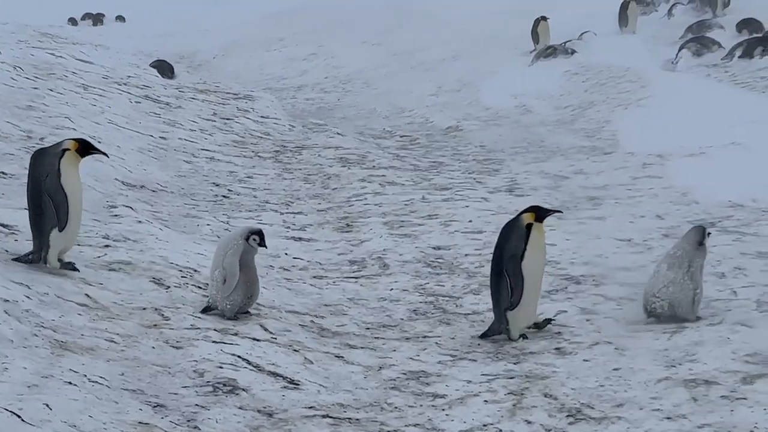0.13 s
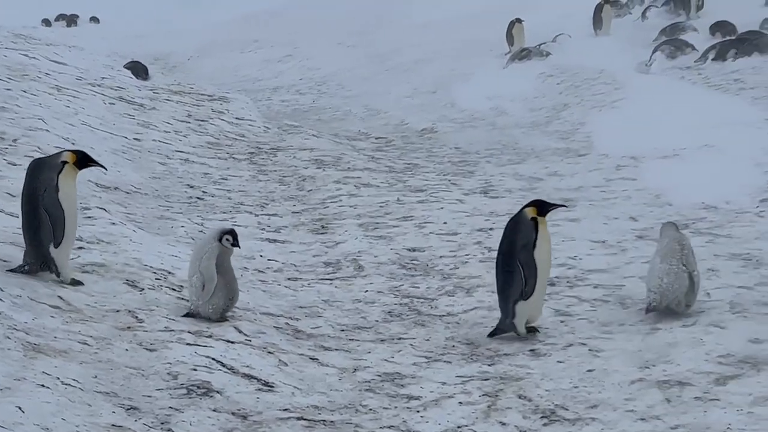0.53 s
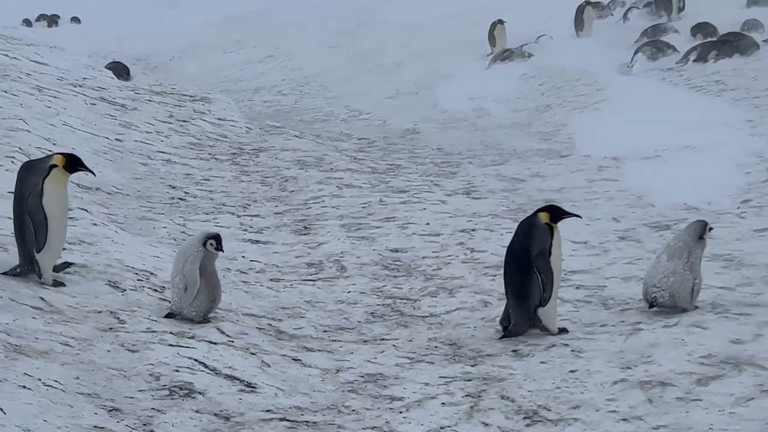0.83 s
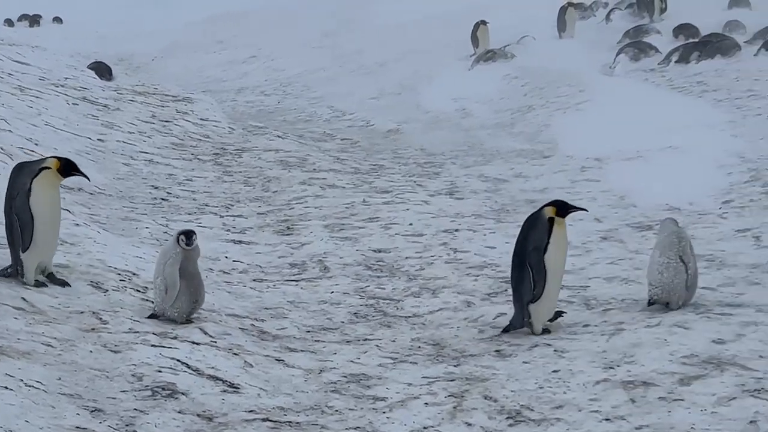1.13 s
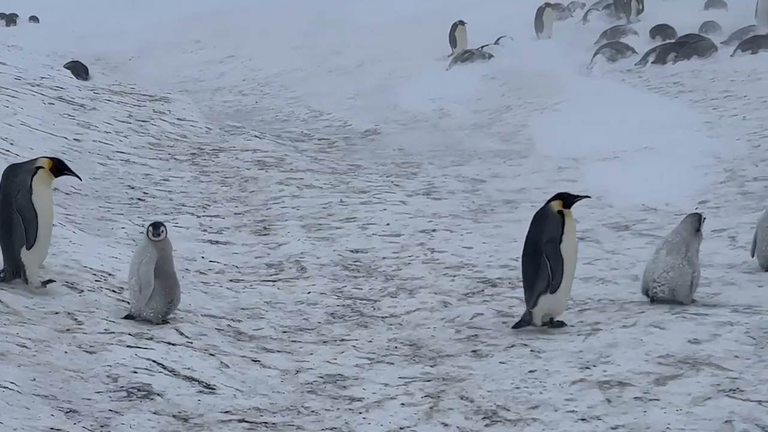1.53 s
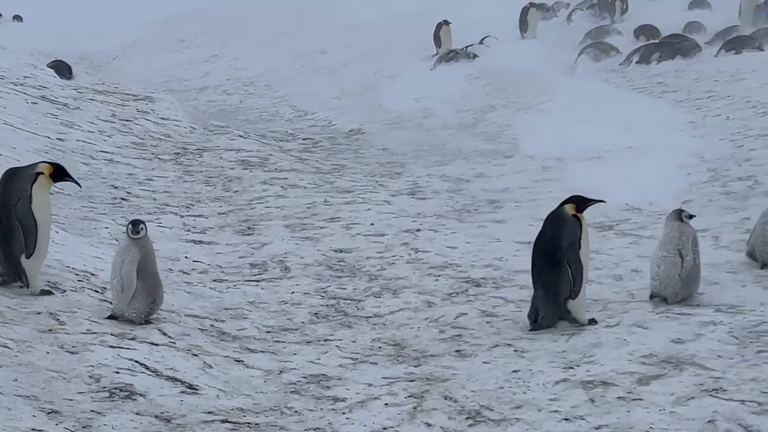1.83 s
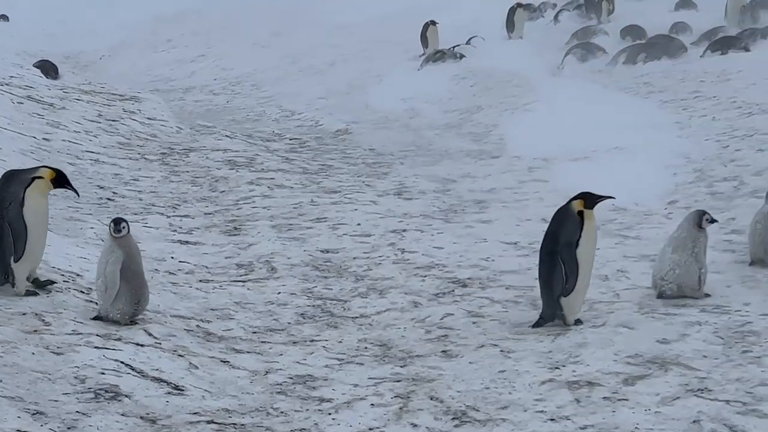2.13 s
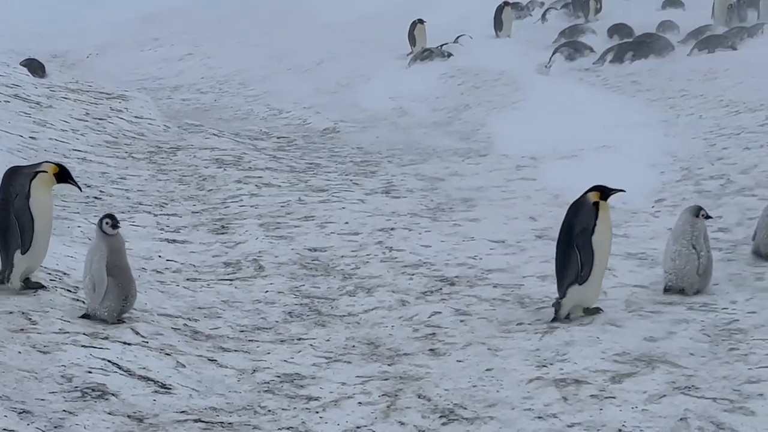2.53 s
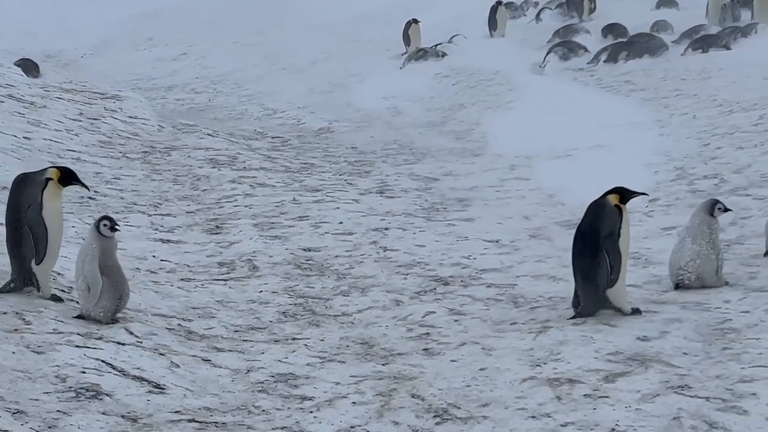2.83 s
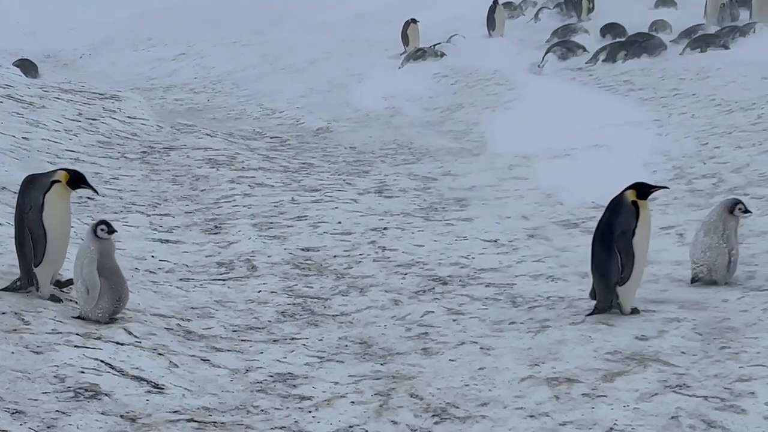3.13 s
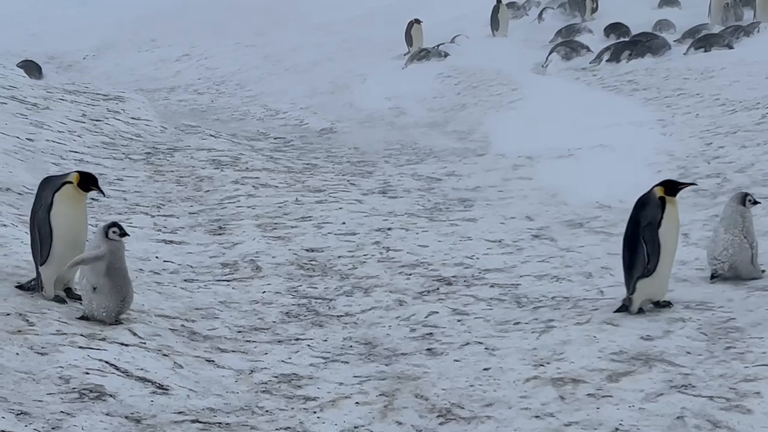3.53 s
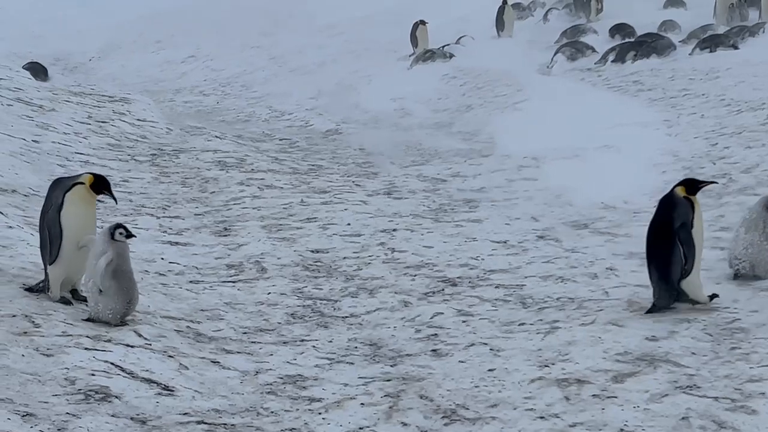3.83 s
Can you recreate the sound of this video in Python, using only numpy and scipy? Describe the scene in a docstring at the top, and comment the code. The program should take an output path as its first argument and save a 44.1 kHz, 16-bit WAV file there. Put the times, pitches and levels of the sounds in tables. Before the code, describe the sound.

Young penguins' short thin whistles bend up and down amid rumbling, gusty wind on snow.

```python
"""Penguin chicks whistle in quick swooping notes on open snow: bent sines with weak overtones and rasp.
A far adult gives one buzzing call of two pulsed voices, then comes a falling sine whistle.
Wind noise rumbles and buffets the microphone; gusts tear into rough flutter, eddies thump as sagging sines.
Feet crunch and ice grains tick on the camera as noise bursts; behind lie a soft hiss, the colony blur,
hoarse pulse-train calls and faint random warbles of other chicks."""
import sys
import numpy as np
from scipy import signal
from scipy.fft import rfft, irfft, next_fast_len
from scipy.io import wavfile
from scipy.ndimage import uniform_filter1d, map_coordinates

SR = 44100
rng = np.random.default_rng(int(sys.argv[2]) if len(sys.argv) > 2 else 0)


def master_out(mix):
    """Clip the mix to full scale and print it as 16-bit PCM to the path in sys.argv[1]."""
    frames = np.transpose(np.atleast_2d(mix))
    ceiling = np.clip(frames, -1, 1)
    pcm = np.round(ceiling * 32767).astype(np.int16)
    wavfile.write(sys.argv[1], SR, pcm)


N = 176400

# left-right likeness of airborne noise: (frequency [Hz], correlation [-1 to 1])
AIR_LIKENESS = [(380, 1), (650, .45), (1400, .4), (2600, .88), (7000, .85)]


def amp(db):
    """Decibels to gain."""
    return 10 ** (np.asarray(db) / 20)


def unit(x):
    """Scale to rms 1."""
    return x / np.sqrt(np.mean(x ** 2) + 1e-20)


def clock():
    """Seconds at each sample."""
    return np.arange(N) / SR


def along(points, hz):
    """Interpolate (Hz, value) points on a log frequency axis."""
    f, v = np.transpose(points)
    return np.interp(np.log(hz + 1), np.log(f + 1), v)


def curves(rows):
    """One value per sample for each column after the time."""
    time_s, *columns = np.transpose(rows)
    return [np.interp(clock(), time_s, c) for c in columns]


def wobble(knots_per_s):
    """A smooth random curve through normal-distributed knots."""
    return map_coordinates(rng.standard_normal(8192), [clock() * knots_per_s], mode="wrap")


def ramp(u):
    """A smooth step from 0 to 1."""
    return np.sin(np.pi / 2 * np.clip(u, 0, 1)) ** 2


def cycles(hz):
    """Running phase [rad] of a pitch curve."""
    return 2 * np.pi * np.cumsum(hz) / SR


def filtered(x, response):
    """Apply a response of frequency to x."""
    m = next_fast_len(N + SR // 2)
    return irfft(rfft(x, m) * response(np.fft.rfftfreq(m, 1 / SR)), m)[..., :N]


def rush(spectrum, likeness, grain=1):
    """Stereo noise of rms 1; grain modulates it before it is coloured."""
    def mid_side(hz):
        turn = np.arccos(np.clip(along(likeness, hz), -1, 1)) / 2
        return amp(along(spectrum, hz)) * [np.cos(turn), np.sin(turn)]

    mid, side = filtered(grain * rng.standard_normal((2, N)), mid_side)
    return unit(np.array([mid + side, mid - side]))


def steadied(x, span_s):
    """Even out the swells of a noise that are slower than span_s."""
    power = uniform_filter1d(np.mean(x ** 2, axis=0), max(int(span_s * SR), 8))
    return x / np.sqrt(np.abs(power) + 1e-9)


def swells(rows, rise_s, fall_s):
    """Rise, hold and fall for each (start, length, dB) row."""
    t = clock()
    return sum(amp(db) * ramp((t - s) / rise_s + .5) * ramp((s + length - t) / fall_s + .5)
               for s, length, db in rows)


def contacts(rows, spectrum, t60_s, rise_s, grain_db):
    """Gritty noise bursts that die fast, one for each (start, dB) row."""
    t = clock()
    level = sum(amp(db - 60 * np.abs(t - s) / t60_s) * ramp((t - s) / rise_s) for s, db in rows)
    return level * rush(spectrum, AIR_LIKENESS, amp(grain_db * wobble(700)))


def chicks():
    """Whistles bent through an arch or a dip; they brighten with pitch, and loud ones turn breathy."""
    # (start [s], length [s], first, middle, last pitch before jitter [Hz], level before note_db [dB])
    notes = [(0.0, 0.054, 2780, 2000, 1920, -39.5), (0.02, 0.044, 2940, 2130, 1590, -41.5),
             (0.602, 0.066, 1700, 2010, 2670, -34.5), (0.747, 0.033, 2905, 2380, 3420, -27.5),
             (.803, .032, 2410, 2380, 2250, -44), (0.836, 0.061, 2635, 1957, 2640, -31),
             (0.904, .072, 2520, 1720, 1630, -34.5), (0.978, 0.067, 1364, 1875, 1300, -38.5),
             (1.359, 0.055, 2025, 1530, 1870, -41.5), (1.509, 0.03, 1440, 1656, 1810, -39),
             (1.561, 0.038, 1830, 1610, 1480, -39), (1.596, 0.047, 2410, 1800, 1680, -44),
             (1.691, 0.069, 1750, 1763, 1500, -42), (1.831, 0.051, 2240, 1866, 1820, -37.5),
             (2.069, 0.074, 1864, 2143, 1860, -41.5), (2.527, 0.11, 2390, 1810, 2370, -43.5),
             (2.7, 0.071, 2026, 1883, 1780, -44.5), (2.815, 0.064, 1762, 2087, 1546, -39),
             (3.109, 0.042, 2350, 2055, 2670, -38.5), (3.203, 0.078, 2600, 2050, 2450, -39.5),
             (3.264, 0.07, 2190, 2360, 1880, -48), (3.414, 0.0916, 2138, 1910, 2166, -42),
             (3.445, 0.069, 1676, 1960, 1620, -39.5), (3.441, 0.099, 3450, 3820, 3440, -51),
             (3.582, 0.076, 2090, 1960, 1700, -38), (3.682, .104, 1397, 2120, 1320, -39),
             (3.847, 0.027, 2000, 2280, 2600, -45.5)]
    # harmonics 2 and up, at middle pitch: level re fundamental [dB]
    overtone_db = [-23, -28]
    # breath noise spectrum: (frequency [Hz], relative level [dB])
    rasp_spectrum = [(1200, -54), (2200, 11.5), (4500, -0.5), (8000, -10), (15000, -32)]
    note_db, edge_s, pitch_jitter = 1, 0.02, 0.0013
    overtone_power, rasp_power, rasp_db = 2, 7.7, -11.5  # powers of pitch / middle pitch

    t, voice, effort = clock(), np.zeros(N), np.zeros(N)
    waver = 1 + pitch_jitter * wobble(250)
    flicker = amp(2.4 * wobble(140))
    for s, length, first, middle, last, db in notes:
        i = (t >= s) & (t < s + length)
        u = 2 * (t[i] - s) / length - 1  # -1 to 1 over the note
        hz = middle + (last - first) / 2 * u + ((first + last) / 2 - middle) * u * u
        climb = hz / middle
        phase = cycles(waver[i] * hz)
        edges = ramp((t[i] - s) / edge_s) ** .5 * ramp((s + length - t[i]) / edge_s) ** .5
        level = amp(db + note_db) * edges
        overtones = sum(amp(d) * np.sin((k + 2) * phase) for k, d in enumerate(overtone_db))
        voice[i] += level * np.sqrt(2) * (np.sin(phase) + climb ** overtone_power * overtones)
        effort[i] += amp(db) * level * climb ** rasp_power
    effort = np.abs(uniform_filter1d(effort, size=900))  # soft rasp edges
    rasp_level = amp(rasp_db) * effort / np.sqrt(effort.max())
    return voice * flicker + rasp_level * rush(rasp_spectrum, AIR_LIKENESS)


def far_chicks(level_db, pitch_hz=1900):
    """Faint far warble: a sine of randomly wandering pitch and level."""
    hz = pitch_hz * np.exp(0.18 * wobble(35))
    return amp(level_db) * ramp(wobble(16)) * np.sqrt(2) * np.sin(cycles(hz))


def wind():
    """Deep rumble, lumpy buffeting, and gusts that break into flutter at the ports."""
    # wind strength: (time [s], level [dB])
    wind_level = [(0, -22.5), (.31, -26), (.45, -12.5), (.6, -21), (.78, -25.5), (.95, -26), (1.16, -35.5),
                  (1.27, -23.5), (1.47, -23), (1.58, -38.5), (1.76, -33.5), (1.93, -21), (2.15, -39.5),
                  (2.34, -26.5), (2.6, -32.5), (3.32, -29), (3.56, -33), (4, -26)]
    # flutter bursts: (start [s], length [s], level [dB])
    gusts = [(.105, 0.031, -13), (0.138, 0.067, -19.5), (.2, 0.046, -23), (0.256, 0.041, -14.5),
             (.347, 0.13, -15.5), (0.487, 0.029, -20), (.622, 0.095, -15), (.942, 0.038, -20.5),
             (1.222, 0.024, -22.5), (1.255, 0.023, -16.5), (1.286, 0.061, -15), (1.43, 0.061, -30),
             (1.888, 0.054, -20.5), (1.963, 0.065, -14), (2.025, 0.041, -25.5), (3.285, 0.054, -25),
             (3.77, 0.024, -24), (3.949, 0.032, -21.5)]
    # noise spectra: (frequency [Hz], relative level [dB per Hz])
    rumble_spectrum = [(20, -28), (35, 8.5), (52, 14), (70, 14), (100, 11.5), (140, 2.5), (260, -62)]
    buffet_spectrum = [(60, -33), (120, 0), (230, 0), (400, -6), (700, -12), (1400, -17), (2200, -37),
                       (4000, -89.5)]
    flutter_spectrum = [(100, -5), (550, -2), (900, -5), (1400, -7.5), (1900, -23), (4000, -50.5),
                        (8000, -91.5)]
    # left-right likeness: (frequency [Hz], correlation [-1 to 1])
    likeness = [(600, 1), (1100, .75), (3000, .4)]
    rumble_db, rumble_follows = -26, 0.44  # level at mean wind; dB per dB of wind
    eddy_db, tear_db = 3.5, 3
    left_db, lag_rad = 7.5, 1.44  # left re right, top of the band

    strength_db, = curves(wind_level)
    rumble = steadied(rush(rumble_spectrum, likeness), span_s=.09)
    rumble = rumble * amp(rumble_db + rumble_follows * (strength_db - strength_db.mean()))
    buffet = steadied(rush(buffet_spectrum, likeness, amp(eddy_db * wobble(170))), span_s=0.085)
    buffet = buffet * amp(strength_db)
    flutter = steadied(rush(flutter_spectrum, likeness, amp(tear_db * wobble(260))), span_s=0.027)
    flutter = flutter * swells(gusts, rise_s=0.013, fall_s=0.017)
    sides = np.array([[.5], [-.5]])

    def ports(hz):  # the top is late and louder at the left port
        gain = amp(left_db * ramp((hz - 1200) / 400) * sides)
        return gain * np.exp(-1j * lag_rad * ramp(hz / 550 - 1) * sides)

    return rumble + filtered(buffet + flutter, ports)


def buzz(spectrum):
    """Two hoarse far voices: pulse trains of wandering pitch, coloured, rms 1."""
    def pulse_train(pitch_hz=271):
        hz = pitch_hz * np.exp(.15 * wobble(2) + .01 * wobble(90))
        return np.exp(700 * (np.cos(cycles(hz)) - 1))

    pulses = pulse_train() + pulse_train()
    return unit(filtered(pulses - pulses.mean(), lambda hz: amp(along(spectrum, hz))))


def air():
    """Wavering hiss with buzz in it, distant colony blur and hoarse calls, all made patchy."""
    # hiss: (time [s], level before hiss_db and waver [dB])
    hiss_level = [(0, -52), (.22, -62), (.6, -56.5), (1.72, -61), (2.08, -55), (2.48, -55.5), (2.68, -54),
                  (3.05, -54.5), (3.085, -72), (3.12, -51.5), (3.88, -52.5), (4, -56)]
    # noise spectra: (frequency [Hz], relative level [dB per Hz])
    hiss_spectrum = [(300, -7), (700, 20), (1300, 14.5), (2200, 6.5), (3000, 9.5), (3800, 9), (4800, 2.5),
                     (8400, -2.5), (9600, -41), (11500, -13), (15500, -17.5)]
    colony_spectrum = [(250, -74), (600, 4.5), (1500, 3), (3000, -11.5), (6000, -82)]
    # hoarse far calls: (start [s], length [s], level [dB])
    brays = [(.06, .1, -48), (.68, 0.13, -48.5), (1.14, 0.11, -47.5), (3.37, 0.104, -51),
             (3.83, 0.082, -50)]
    # colour of the hoarse calls: (frequency [Hz], relative gain [dB])
    bray_spectrum = [(2400, -7.5), (3300, -0.5), (3850, 9), (4500, -29), (6500, -37.5)]
    hiss_db, waver_db, colony_db, patchy_db = 11, 2.8, -44.5, 2

    level = amp(curves(hiss_level)[0] + hiss_db + waver_db * wobble(21.67))
    hiss = level * unit(rush(hiss_spectrum, AIR_LIKENESS) + .5 * buzz(hiss_spectrum))
    colony = amp(colony_db) * rush(colony_spectrum, AIR_LIKENESS)
    calls = swells(brays, rise_s=0.0069, fall_s=0.021) * buzz(bray_spectrum)
    z = signal.stft(hiss + colony + calls, nperseg=512)[2]
    # smoothed random gain over frequency and time
    field = uniform_filter1d(rng.standard_normal(z.shape[1:]), size=4, axis=0)
    field = uniform_filter1d(field, size=16, axis=1)
    return signal.istft(z * amp(patchy_db * unit(field)), nperseg=512)[1][:, :N]


def ticks():
    """Each ice grain on the camera is one click with its own low-pass brightness."""
    # (start [s], level before low-pass [dB], brightness: -6 dB corner [Hz])
    grains = [(.115, -14, 6100), (2.125, -41.5, 12000), (2.384, -31, 11000), (3.26, -16, 16100)]
    # click spectrum: (frequency [Hz], relative level [dB])
    tick_spectrum = [(2000, -6), (15000, -11)]

    out = 0
    for s, db, corner_hz in grains:
        click = contacts([(s, db)], tick_spectrum, t60_s=0.0044, rise_s=1 / SR, grain_db=1.5)
        out = out + filtered(click, lambda f: 1 / (1 + (f / corner_hz) ** 4))
    return out


def thumps():
    """Each heavy eddy at the microphone is a pressure swing that slows as it dies."""
    # (start [s], first pitch before random spread [Hz], level before decay [dB])
    eddies = [(0.472, 253, -5), (.563, 300, -2.5), (.588, 853, -5), (.598, 181, 1), (0.973, 119, -12),
              (1.23, 295, -7.5), (1.267, 222, -9.5), (2.243, 203, -12), (2.864, 282, -11),
              (3.972, 156, -5.5)]
    end_hz, sag_s, decay_s = 60.3, 0.0056, 0.017  # end pitch before spread; time constants

    out = np.zeros(N)
    for s, first_hz, db in eddies:
        t = np.maximum(clock() - s, 0)
        hz = end_hz + (first_hz - end_hz) * np.exp(-t / sag_s)
        spread = np.exp(0.12 * rng.standard_normal())
        swing = np.sin(cycles(hz * (t > 0)) * spread)
        out += amp(db) * ramp(t / 0.0025) * np.exp(-t / decay_s) * swing
    return out


def crunches():
    """Feet break the snow crust in short gritty noise bursts."""
    # (start [s], level [dB])
    steps = [(.587, -15.5), (1.651, -29.5), (1.793, -24), (2.298, -23), (2.465, -24.5), (2.864, -21.5),
             (3.138, -24.5), (3.298, -26), (3.648, -22)]
    # crunch spectrum: (frequency [Hz], relative level [dB])
    crunch_spectrum = [(150, -14), (600, 5.5), (1500, -2), (2500, -17.5), (6000, -44.5), (12000, -59.5)]
    return contacts(steps, crunch_spectrum, t60_s=0.068, rise_s=0.0017, grain_db=4.0)


def far_gain(rows, db):
    """Gain of a distant call, faded at both ends."""
    t = clock()
    return amp(db) * ramp((t - rows[0][0]) / 0.013) * ramp((rows[-1][0] - t) / 0.014)


def far_calls():
    """An adult's two voices arch separately, pulsing faster by the end; a falling whistle follows."""
    # (time [s], low voice [Hz], high voice [Hz], pulse rate before jitter [1/s], level [dB])
    adult = [(2.45, 935, 2590, 72, -37), (2.53, 942, 2690, 71, -33), (2.64, 995, 2780, 82, -28.5),
             (2.73, 998, 2704, 79, -30.5), (2.91, 880, 2500, 89.5, -39.5)]
    # falling whistle: (time [s], pitch [Hz], level [dB])
    far_whistle = [(2.95, 1330, -42), (2.978, 1210, -36), (3.02, 1078, -31), (3.08, 960, -47)]
    beat_depth, upper_db = 0.85, -17

    low_hz, high_hz, beat_hz, adult_db = curves(adult)
    beat = cycles(beat_hz * (1 + 0.055 * wobble(30)))
    low = (1 + beat_depth * np.sin(beat)) * np.sin(cycles(low_hz) + .8 * wobble(140))
    high = (1 + .5 * np.sin(2 * beat)) * np.sin(cycles(high_hz))
    call = far_gain(adult, adult_db) * (low + amp(upper_db) * high)
    whistle_hz, whistle_db = curves(far_whistle)
    return call + far_gain(far_whistle, whistle_db) * np.sin(cycles(whistle_hz))


def scene():
    """Sum of all sources; open snow gives no echo."""
    birds = chicks() + far_calls() + sum(far_chicks(level_db=-52) for _ in range(3))
    return birds + wind() + air() + ticks() + thumps() + crunches()


def record(dry):
    """The camera keeps nothing above its band limit."""
    top_hz = 15900
    return filtered(dry, lambda hz: hz < top_hz)


dry = scene()
out = record(dry)
master_out(out)
```